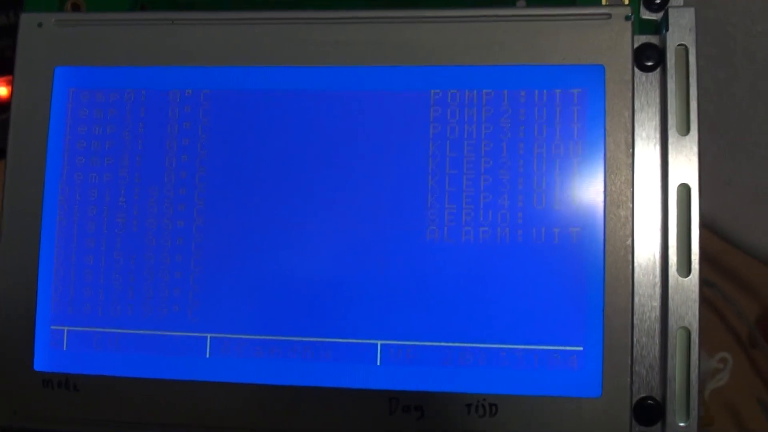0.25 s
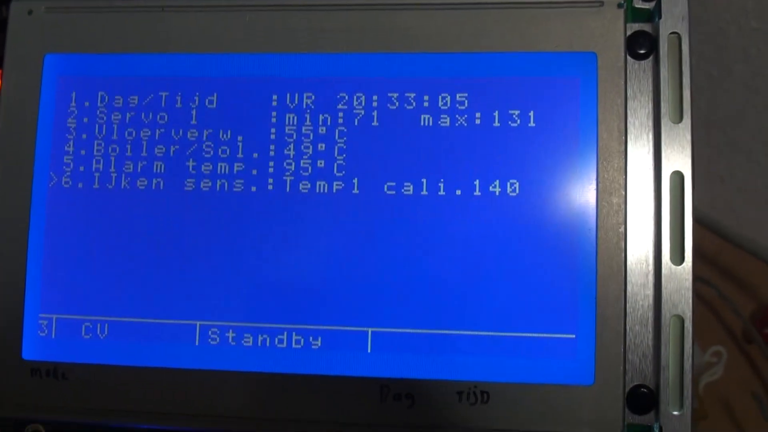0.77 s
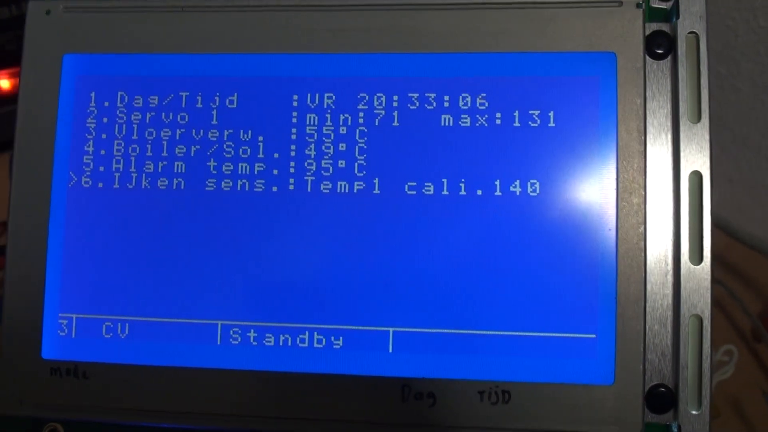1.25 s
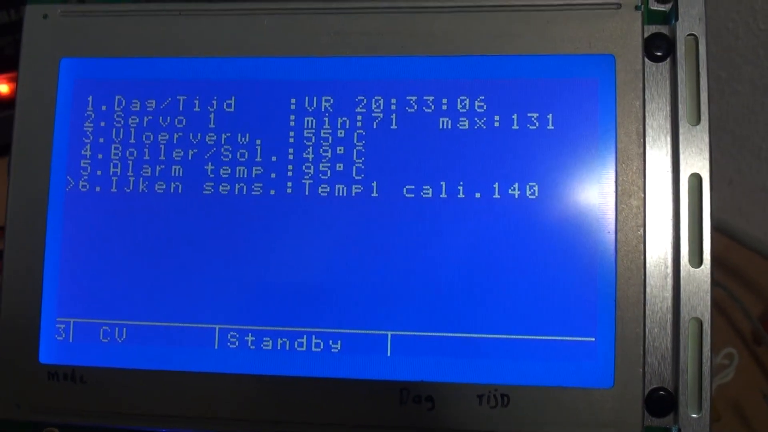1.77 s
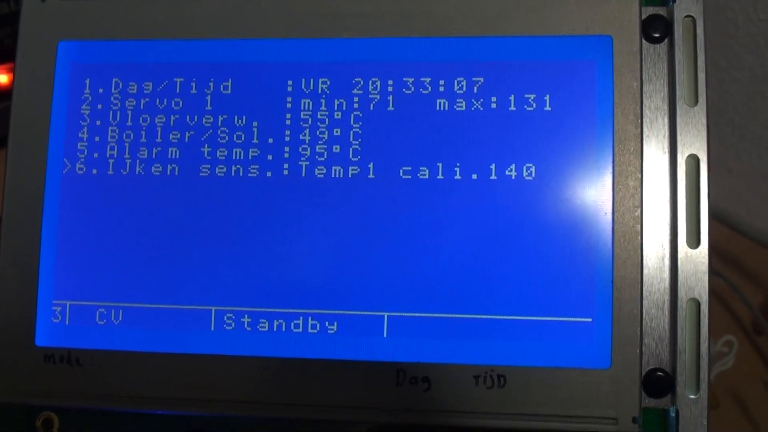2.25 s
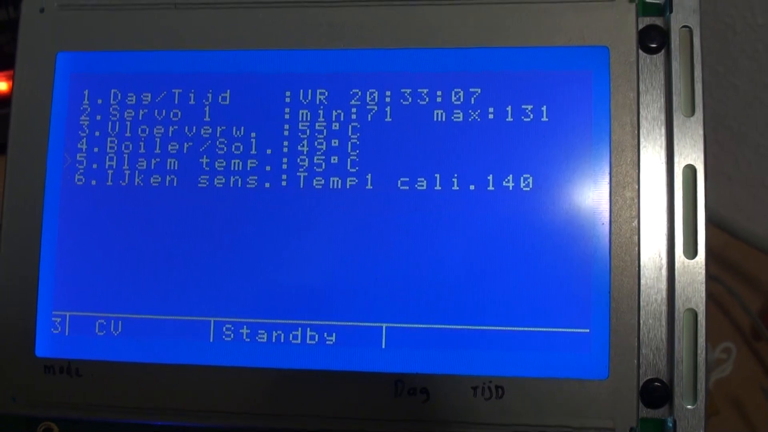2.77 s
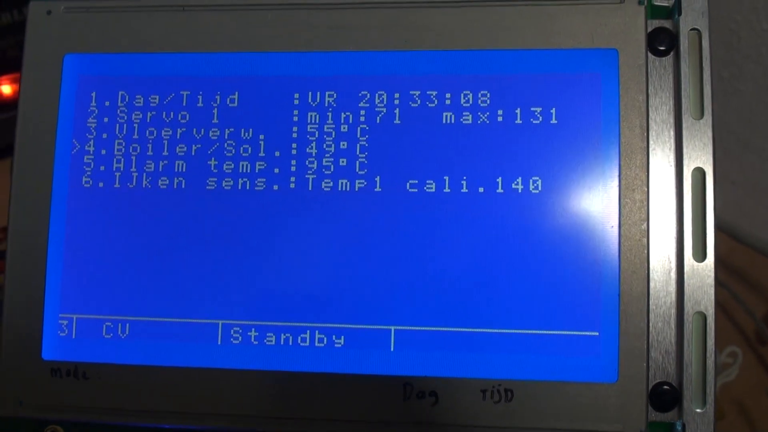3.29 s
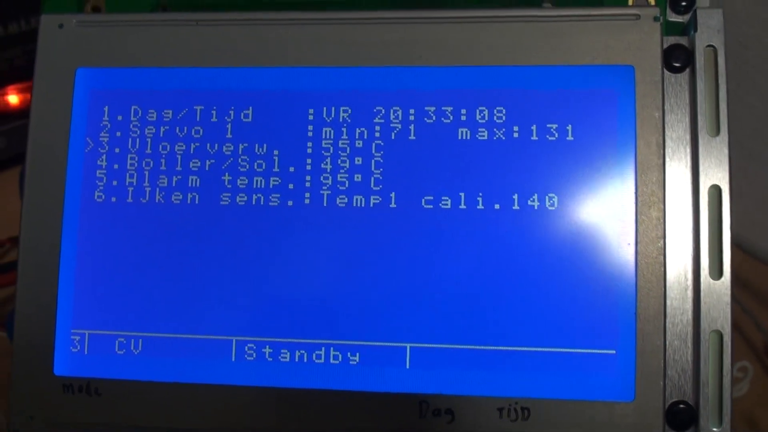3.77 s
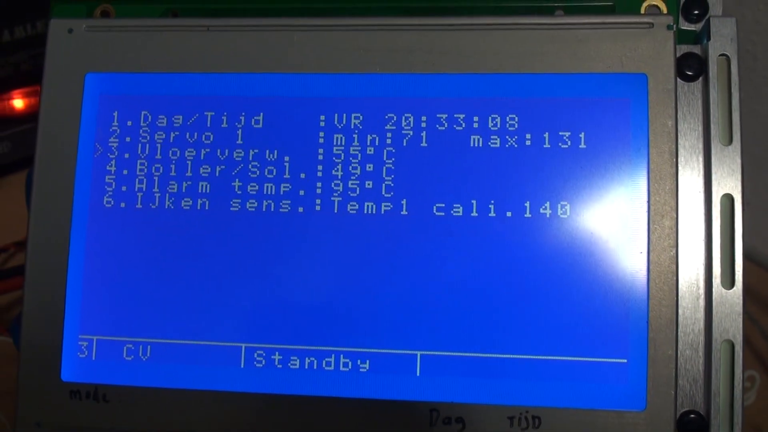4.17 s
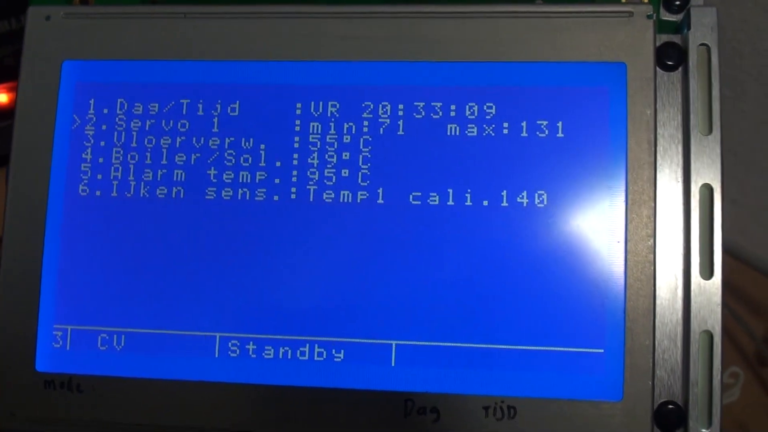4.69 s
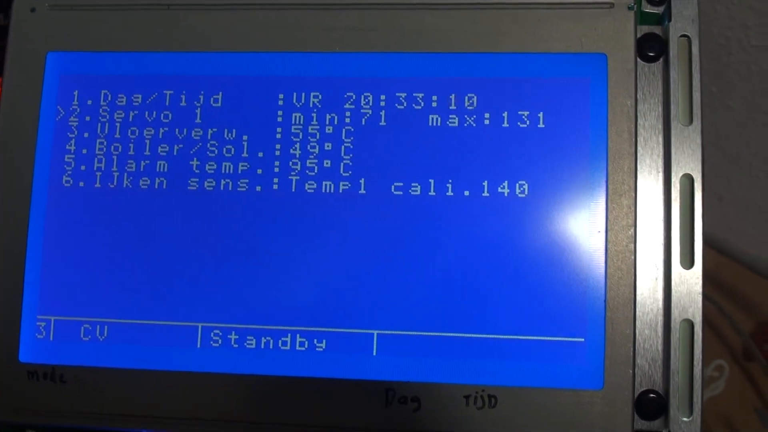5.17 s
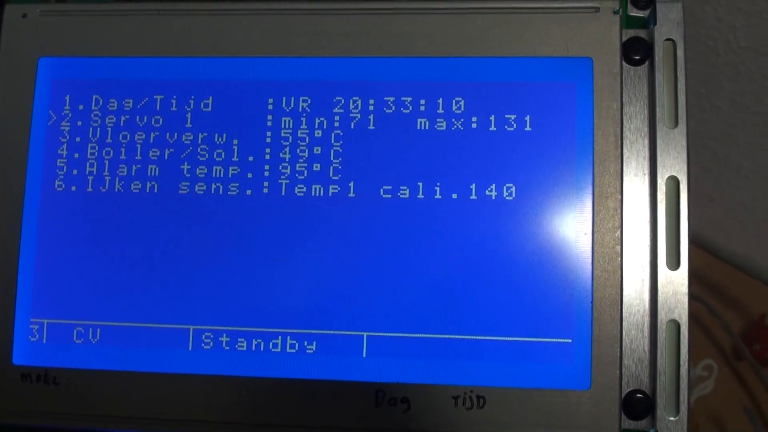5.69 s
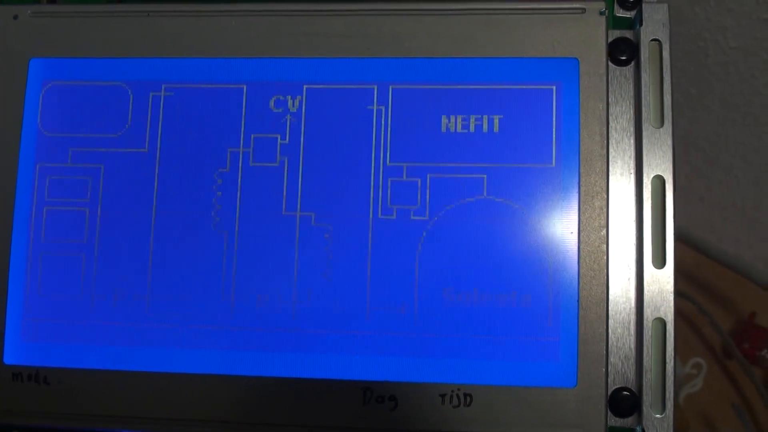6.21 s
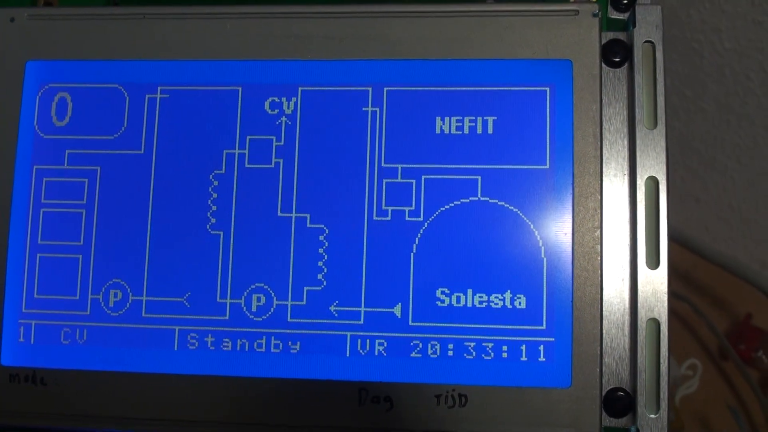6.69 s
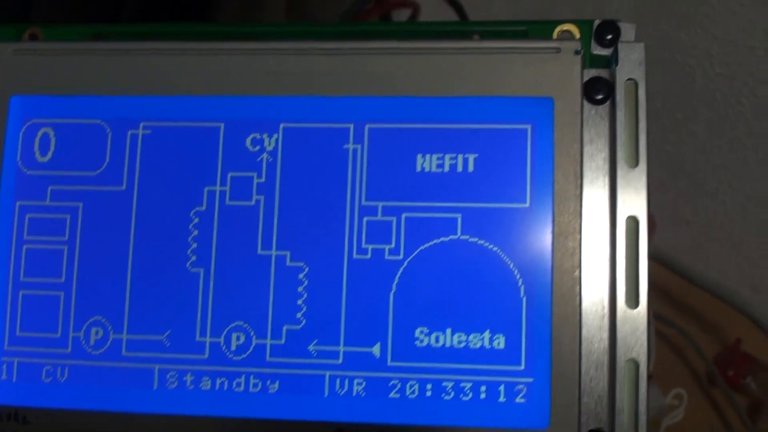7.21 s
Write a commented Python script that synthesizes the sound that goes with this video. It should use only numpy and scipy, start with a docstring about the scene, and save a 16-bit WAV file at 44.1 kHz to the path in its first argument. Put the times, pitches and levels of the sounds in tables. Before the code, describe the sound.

Close to a bare circuit board in a quiet room, a small button springs back with a sharp click. After a pause, three press-and-release pairs follow, the releases brighter and louder. A very faint metallic rub comes between them. Later a dull press and a hard release, then soft bumps and a light tap at the end, over faint hiss and hum.

```python
"""Quiet room, close to a bare circuit board: small tactile push buttons are pressed and let go.
Each click is a noise-burst crack, a board shiver, the dome's ringing sines and a low knock, with room tail.
Once something brushes over metal: friction noise drives narrow ringing modes.
Tiny ticks, soft handling bumps and a dull tap are shaped noise; below lie filtered hiss and a sine hum."""
import sys
import numpy as np
from scipy import signal
from scipy.fft import rfft, irfft, next_fast_len
from scipy.io import wavfile
from scipy.ndimage import uniform_filter1d, map_coordinates

SR = 44100
rng = np.random.default_rng(int(sys.argv[2]) if len(sys.argv) > 2 else 0)


def generate_wav(sig):
    """Save sig (samples, or channels by samples) to the path in sys.argv[1] as 16-bit PCM at SR."""
    pcm = np.round(np.clip(np.atleast_2d(sig).T, -1, 1) * 32767).astype(np.int16)
    wavfile.write(sys.argv[1], SR, pcm)


N = 328545
TIME = np.arange(N) / SR
HIT = TIME[:SR // 3]  # time axis of one short event, s

# spectrum of plunger scrapes and finger ticks: f/Hz, relative level/dB
TICK_SPECTRUM = [(3000, -31), (6000, 0), (8300, 1), (10500, -7), (12200, 3), (15000, -14)]


def buttons():
    """Pressing rattles against the stop; letting go cracks harder; each button has its own resonances."""
    # dome gives way under the finger: t/s, snap energy/dB, treble tilt/dB, button
    presses = [(2.3122, -7, 5, "step"), (3.1681, -6, 2.5, "step"), (3.9379, -5.5, 3.5, "step"),
               (5.4401, -14, 0.5, "exit")]
    # dome springs back: t/s, snap energy/dB, treble tilt/dB, button
    releases = [(0.1858, -5, 3, "menu"), (2.5818, -0.8, 0, "step"), (3.3671, 0, 0, "step"),
                (4.1855, -0.5, 0, "step"), (5.6392, -3, 1, "exit")]
    # switch and board resonances, step button pressed: f/Hz, width/Hz, relative level/dB
    press_body = [(780, 670, -16.5), (1440, 440, -13.5), (2230, 330, -18.5), (2590, 420, -13),
                  (2900, 240, -19), (3170, 290, -16), (3860, 400, -12), (4510, 330, -10),
                  (5400, 830, -10.5), (6400, 880, -8.5), (6830, 90, -19), (7420, 830, 1.5),
                  (8160, 510, -10), (8800, 790, -9), (9830, 510, -4.5), (10600, 310, -19), (11380, 670, -3),
                  (12100, 370, -3.5), (12900, 460, -9), (13700, 430, -13), (14180, 620, -15),
                  (14920, 370, -23.5), (15740, 450, -32.5)]
    # step button released: f/Hz, width/Hz, relative level/dB
    release_body = [(600, 380, -17.5), (950, 260, -15.5), (1860, 570, -15.5), (2130, 350, -17.5),
                    (2870, 520, -29), (3190, 200, -16), (3630, 210, -26), (3640, 150, -13.5),
                    (5310, 1350, -6.5), (5740, 630, -4), (6960, 1270, -0.5), (7240, 530, -6.5),
                    (8830, 680, -6), (9460, 600, -8), (10250, 750, -6), (11000, 420, -9), (11330, 590, -7),
                    (11880, 940, -12.5), (12860, 980, -13), (13600, 420, -11), (14100, 530, -11.5),
                    (14770, 550, -12)]
    # menu button released: f/Hz, width/Hz, relative level/dB
    menu_body = [(610, 530, -15.5), (1150, 460, -10), (1390, 290, -16), (1900, 350, -6), (2550, 390, -4.5),
                 (3300, 350, -7.5), (3930, 270, -14), (4350, 830, -9), (4980, 440, -0.5), (5480, 330, -9.0),
                 (5940, 620, -1), (6860, 1300, 1), (8090, 810, -3.5), (8700, 700, -3), (9750, 540, 1),
                 (10250, 310, -7.5), (11000, 650, -10), (12300, 950, -1.5), (14520, 740, -10),
                 (15110, 640, -12)]
    # exit button pressed: f/Hz, width/Hz, relative level/dB
    exit_body = [(650, 430, -9), (1080, 450, -7.5), (2280, 220, -11), (2560, 280, -6), (3450, 490, -13),
                 (4620, 720, -4), (5810, 470, 3), (7170, 780, -2), (7910, 420, -1), (8750, 430, -6),
                 (9410, 490, -8), (10620, 1120, -10.0), (12110, 1770, -8), (15050, 770, -24.5)]
    # exit button released: f/Hz, width/Hz, relative level/dB
    exit_release_body = [(700, 740, -15.5), (1075, 170, -5), (1500, 400, -13.5), (1900, 420, -16.5),
                         (2400, 580, -13), (3160, 640, -23), (4880, 720, -2), (5630, 700, 3),
                         (6370, 1100, 0.5), (7100, 880, -1), (8700, 1200, -1), (9600, 900, -6),
                         (11300, 1700, -5.5), (13000, 1600, -12), (15000, 970, -8)]
    # ring of the dome held down: f/Hz, relative level/dB, t60/s
    press_modes = [(6410, -12, 0.21), (6900, -12, .14), (7370, 8, 0.094), (7560, -13, 0.14), (8330, 2, .13),
                   (9900, -1, 0.09), (11250, -12, 0.084), (12700, -13, 0.092)]
    # ring of the dome set free: f/Hz, relative level/dB, t60/s
    release_modes = [(5540, -2, .17), (5560, -4, .17), (6040, -5, 0.21), (6500, 4, 0.077),
                     (6542, -17, 0.13), (6700, 1, 0.14), (7100, -10, .19), (7190, -5, .16), (7200, -3, .14),
                     (8800, -3, 0.27), (9400, 10, 0.091), (9700, -9, 0.14), (11300, -15, 0.13)]

    step_down = clicks(presses, "step", press_body, press_modes,
                       width_s=0.00017, crack_db=-3, board_t60_s=0.032, room_db=-9.5, ring_db=-11.5,
                       knock_db=-12, knock_t60_s=0.028, knock_room_db=-6.5, scrape_db=-25)
    step_up = clicks(releases, "step", release_body, release_modes,
                     width_s=0.0005, crack_db=0, board_t60_s=0.051, room_db=-7.2, ring_db=-16,
                     knock_db=-18.5, knock_t60_s=0.037, knock_room_db=-5, scrape_db=-33)
    menu_up = clicks(releases, "menu", menu_body, release_modes,
                     width_s=0.0003, crack_db=-3, board_t60_s=0.03, room_db=-7.5, ring_db=-21,
                     knock_db=-9.5, knock_t60_s=0.05, knock_room_db=-6.5, scrape_db=-40)
    exit_down = clicks(presses, "exit", exit_body, press_modes,
                       width_s=0.0003, crack_db=-18, board_t60_s=0.033, room_db=-7.5, ring_db=-21,
                       knock_db=-8.5, knock_t60_s=0.045, knock_room_db=-4.5, scrape_db=-28)
    exit_up = clicks(releases, "exit", exit_release_body, release_modes,
                     width_s=0.00034, crack_db=0, board_t60_s=0.055, room_db=-8.5, ring_db=-19,
                     knock_db=-15, knock_t60_s=0.033, knock_room_db=-4.5, scrape_db=-22)
    return step_down + step_up + menu_up + exit_down + exit_up


def clicks(rows, button, body, modes, width_s, crack_db, board_t60_s, room_db, ring_db,
           knock_db, knock_t60_s, knock_room_db, scrape_db, change_db=-5):
    """Each click: crack, board shiver, dome ring, lower knock and a faint plunger scrape."""
    out = np.zeros(N)
    # part of the shake common to all clicks of this button
    shiver = dying(board_t60_s, rise_s=0.00047)
    for t_s, snap_db, tilt_db, name in rows:
        if name != button:
            continue
        shake = packet(shiver + amp(change_db) * dying(board_t60_s, rise_s=0.00031))
        blow = amp(crack_db) * crack(width_s) + shake
        ring = dome_ring(modes, width_s)
        # the dome drives the high resonances, the finger's push the low ones
        treble = [(2800, -44), (4000, -tilt_db / 2), (7000, -tilt_db / 2), (12500, tilt_db / 2)]
        bass = [(3900, -4), (5000, -49)]
        dome = packet(struck(blow, body, treble, room_db) + amp(ring_db) * ring)
        knock = struck(dying(knock_t60_s, rise_s=0.00033), body, bass, knock_room_db)
        # start two widths early: the crack is fullest at t_s
        add(out, t_s - 2 * width_s, amp(snap_db) * (dome + amp(knock_db) * knock))
        # the plunger scrapes just before the dome flips
        scrape = packet(coloured(dying(0.024, rise_s=0.002), lambda hz: along(TICK_SPECTRUM, hz)))
        add(out, t_s - 0.003, amp(snap_db + scrape_db) * scrape)
    return out


def crack(width_s):
    """The dome flips: a very short burst with an even spectrum, fullest after two widths."""
    burst = rng.standard_normal(len(HIT))
    window = np.exp(-0.5 * (HIT / width_s - 2) ** 2)
    # alternate between flat spectrum and short window
    for _ in range(3):
        phase = np.angle(rfft(burst * window))
        burst = window * irfft(np.exp(1j * phase), len(HIT))
    return packet(burst)


def dome_ring(modes, rise_s):
    """Steel dome modes: decaying sines of random phase, levels varied by 2 dB; energy 1."""
    ring = np.zeros(len(HIT))
    for hz, db, t60_s in modes:
        decay = amp(db + rng.normal(0, 2) - 60 * HIT / t60_s)
        ring += decay * np.sin(2 * np.pi * (hz * HIT + rng.random()))
    return packet(ring * (1 - np.exp(-HIT / rise_s)))


def struck(blow, modes, slope, room_db):
    """A blow sounds through resonances and a spectral slope, and the room answers; energy 1."""
    def body_db(hz):
        power = sum(amp(db) ** 2 * np.abs(resonance(hz, centre, width) ** 2) ** 2
                    for centre, width, db in modes)
        return 10 * np.log10(power + 1e-12)

    def direct_db(hz):
        # divide by the blow's smoothed spectrum: every resonance is fed evenly
        blow_power = np.abs(rfft(blow, 2 * (len(hz) - 1))) ** 2
        smooth_power = np.abs(uniform_filter1d(blow_power, size=240))
        return body_db(hz) - 10 * np.log10(smooth_power + 1e-12) + along(slope, hz)

    def diffuse_db(hz):
        # the room gathers sound from all directions, which blurs the high resonances
        blurred = uniform_filter1d(body_db(hz), size=450)
        return np.where(hz > 1000, blurred, body_db(hz)) + along(slope, hz)

    direct = packet(coloured(blow, direct_db))
    diffuse = packet(coloured(room_tail(), diffuse_db))
    return packet(direct + amp(room_db) * diffuse)


def room_tail(rise_s=0.0012):
    """The room's answer: noise whose treble dies first; energy 1."""
    # room decay: f/Hz, t60/s
    room = [(400, 0.56), (1500, 0.23), (6000, .2), (10000, 0.16), (16000, 0.16)]
    hz, t, spectrum = signal.stft(rng.standard_normal(len(HIT)), SR, nperseg=256)
    decay = amp(-60 * t / along(room, hz)[:, None])
    tail = signal.istft(spectrum * decay, SR, nperseg=256)[1][:len(HIT)]
    return packet(tail * (1 - np.exp(-HIT / rise_s)))


def brush(level_db=-48, body_ring_db=-2.5, body_rub_db=-4.0, fizz_ring_db=-1.5, fizz_rub_db=-4.3,
          split_hz=3400, grain_db=1.4):
    """A short rubbing stroke: friction noise, and narrow metal modes that sing under its pressure."""
    # low modes of the rubbed metal: f/Hz, width/Hz, relative level/dB
    metal_low = [(833, 17, -0.5), (850, 18, 3.5), (960, 38, -5), (1030, 52, -1), (1074, 40, -4),
                 (1270, 35, -4), (1346, 26, -1), (1730, 20, -13), (2005, 48, -5), (2160, 25, -10),
                 (2400, 20, -10), (2490, 5, -3), (2610, 11, -10.5)]
    # high modes of the rubbed metal: f/Hz, width/Hz, relative level/dB
    metal_high = [(4120, 22, -17), (4930, 32, -8), (5160, 31, -18), (5480, 29, -0.5), (6100, 31, -8),
                  (6020, 91, 0), (6300, 29, -11), (6510, 23, -9), (6670, 31, -7), (7010, 72, -4),
                  (7300, 70, -9), (7410, 15, -17), (7920, 47, -3), (8100, 29, -6), (8500, 26, -17),
                  (9260, 36, -8), (9750, 37, -16), (10300, 47, -15), (10500, 35, -11), (10600, 34, -10),
                  (10800, 28, -14), (11200, 26, -16), (11600, 86, -4.5), (12400, 72, -14), (13100, 74, -9),
                  (13900, 50, -13)]
    # friction noise spectrum: f/Hz, relative level/dB
    friction = [(120, -22), (250, -7), (600, -9), (760, -8), (880, -3), (1150, -5.5), (1350, -3),
                (1520, -15), (1950, -7), (2500, -14), (3150, -26), (4600, -24), (5400, -16), (6230, -12),
                (10000, -19), (13400, -19), (16000, -34)]
    start_s, attack_s, hold_s, release_s = 3.49, 0.089, 0.082, 0.15
    sag_db, depth_db = 4, 25.5  # loss over the hold; first and last touch below the peak
    fizz_db, fizz_growth = 1, 1.28  # treble against body; its swing per dB of pressure

    t = TIME[:SR // 2]  # the metal rings on after the contact ends
    corners_s = np.cumsum([0, attack_s, hold_s, release_s])
    contact = np.clip((corners_s[-1] - t) / 0.02, 0, 1)
    pressure_db = np.interp(t, corners_s, [-depth_db, 0, -sag_db, -depth_db])
    push = contact * amp(pressure_db)
    scrape = contact * amp(fizz_db + fizz_growth * pressure_db)

    noise = filtered(rng.standard_normal(len(t)), lambda hz: amp(along(friction, hz)))
    rub = amp(grain_db * wobble(121, len(t))) * noise
    low_rub = filtered(rub, lambda hz: hz < split_hz)
    high_rub = rub - low_rub
    body = amp(body_ring_db) * singing(metal_low, push) + amp(body_rub_db) * push * unit(low_rub)
    fizz = amp(fizz_ring_db) * singing(metal_high, scrape) + amp(fizz_rub_db) * scrape * unit(high_rub)
    out = np.zeros(N)
    add(out, start_s, amp(level_db) * (body + fizz) * signal.windows.tukey(len(t), 0.1))
    return out


def singing(modes, drive):
    """Narrow modes driven with wandering strength and pitch; the narrower, the longer they ring."""
    out = np.zeros(len(drive))
    for hz, width_hz, db in modes:
        keep = np.exp(-np.pi * abs(width_hz) / SR)
        force = drive * amp(db + 4.1 * wobble(43.7, len(drive)))
        swing = signal.lfilter([1 - keep], [1, -keep], force)
        pitch_hz = hz + width_hz / 3 * wobble(82, len(drive))
        out += swing * np.sin(2 * np.pi * np.cumsum(pitch_hz) / SR)
    return np.linalg.norm(drive) * packet(out)


def handling():
    """Tiny ticks of the button caps and dull bumps of the hand."""
    return ticks() + bumps()


def ticks(gain_db=11, room_db=-2):
    """The finger resting on a button: short coloured noise touches with room tail."""
    # clearest ticks: t/s, level/dB before gain_db
    clear_ticks = [(1.343, -51), (1.6047, -46.5), (2.2523, -48), (2.3005, -45), (2.4947, -52), (2.685, -49)]
    out = np.zeros(N)
    for t_s, db in [*clear_ticks, *faint_ticks(count=5)]:
        touch = dying(0.021, rise_s=0.0005) + amp(room_db) * room_tail()
        tick = packet(coloured(touch, lambda hz: along(TICK_SPECTRUM, hz)))
        add(out, t_s, amp(db + gain_db) * tick)
    return out


def faint_ticks(count):
    """Fainter ticks at random times while the finger rests: t/s, level/dB before the tick gain."""
    return [(rng.uniform(1.0, 4.5), rng.normal(-57, 1.5)) for _ in range(count)]


def bumps():
    """Soft bumps and rustles of the hand: band noise that swells and dies."""
    # bumps: t/s, level/dB, f/Hz, Gaussian width/octaves, rise/s, t60/s
    hand_bumps = [(2.69, -53, 700, 0.14, 0.0089, 0.12), (2.964, -56.5, 1570, .6, .02, 0.29),
                  (4.875, -58.5, 1800, 1.25, .004, 0.14), (5.52, -51.5, 345, 0.24, 0.01, 0.15),
                  (6.24, -47.5, 382, 0.055, 0.015, 0.13)]
    out = np.zeros(N)
    for t_s, db, centre_hz, octaves, rise_s, t60_s in hand_bumps:
        band = filtered(rng.standard_normal(len(HIT)),
                        lambda hz: np.exp(-0.5 * (np.log2((hz + 1) / centre_hz) / octaves) ** 2))
        swell = amp(-60 * HIT / t60_s) * (1 - np.exp(-HIT / rise_s))
        add(out, t_s, amp(db) * np.linalg.norm(swell) * packet(band * swell))
    return out


def tap(t60_s=0.018, room_db=-12):
    """One light contact with the housing: burst and decaying noise, dulled by a low-mid spectrum."""
    # taps: t/s, energy/dB
    taps = [(7.314, -25.5)]
    # tap spectrum: f/Hz, relative level/dB
    tap_spectrum = [(400, -22), (700, -20), (1100, -2), (1350, 9.5), (1700, -7), (2200, -4), (2700, -10),
                    (3500, -28), (6000, -42)]
    out = np.zeros(N)
    for t_s, db in taps:
        blow = crack(0.0002) + dying(t60_s, rise_s=0.00045) + amp(room_db) * room_tail()
        add(out, t_s, amp(db) * packet(coloured(blow, lambda hz: along(tap_spectrum, hz))))
    return out


def background(hiss_db=-62.5, bands_db=-69, hum_db=-1, drift_cycles=0.48):
    """Steady room noise with a few resonant bands, and a hum wavering in level and phase."""
    # room noise spectrum: f/Hz, relative level/dB
    quiet = [(20, -42), (30, -15), (45, -3), (80, -7), (111, -1.5), (163, -2.5), (191, -8), (240, -5.5),
             (377, -11), (456, -14), (560, -12), (764, -11.5), (1060, -14), (5110, -23.5), (16400, -29.5)]
    # resonant noise bands: f/Hz, width/Hz, level/dB before bands_db
    air_modes = [(80.6, 17, -3.5), (157.7, 11.7, -4), (310, 61, -6.5), (534.8, 55, -4.5), (658.6, 65, -7),
                 (6453, 35, -13.5)]
    # hum partials: f/Hz, level/dB before hum_db
    hum_partials = [(118.4, -71), (236.9, -75), (672.9, -81.5), (748.3, -74), (2498, -89.5)]
    hiss = unit(filtered(rng.standard_normal(N), lambda hz: amp(along(quiet, hz))))
    bands = np.zeros(N)
    for centre_hz, width_hz, db in air_modes:
        band = filtered(rng.standard_normal(N), lambda hz: resonance(hz, centre_hz, width_hz) ** 2)
        bands += amp(db) * unit(band)
    hum = np.zeros(N)
    for hz, db in hum_partials:
        tone = np.sin(2 * np.pi * (hz * TIME + drift_cycles * wobble(4)))
        hum += amp(db + 1.7 * wobble(3.13)) * unit(tone)
    return amp(hiss_db) * hiss + amp(bands_db) * bands + amp(hum_db) * hum


def amp(db):
    """Decibels to gain."""
    return 10 ** (np.asarray(db) / 20)


def unit(x):
    """Scaled to rms 1."""
    return x / np.sqrt(np.mean(x ** 2) + 1e-20)


def packet(x):
    """Scaled to energy 1."""
    return x / (np.linalg.norm(x) + 1e-20)


def along(points, hz):
    """(f/Hz, value) points interpolated on a log frequency axis."""
    f, v = np.transpose(points)
    return np.interp(np.log(hz + 1), np.log(f + 1), v)


def filtered(x, response):
    """x times a response of frequency, zero-padded."""
    m = next_fast_len(len(x) + 8192)
    return irfft(rfft(x, m) * response(np.fft.rfftfreq(m, 1 / SR)), m)[:len(x)]


def coloured(x, level_db):
    """Minimum-phase filter with the given dB over frequency: attacks stay sharp."""
    def response(hz):
        # fold the cepstrum onto positive time; gain floor -80 dB
        cepstrum = irfft(np.log(np.maximum(amp(level_db(hz)), 1e-4)))
        half = len(cepstrum) // 2
        cepstrum[1:half] *= 2
        cepstrum[half + 1:] = 0
        return np.exp(rfft(cepstrum))
    return filtered(x, response)


def resonance(hz, centre_hz, width_hz):
    """Response of one damped mode."""
    damping = 1j * hz * width_hz
    return damping / (centre_hz * centre_hz - hz * hz + damping)


def wobble(rate_hz, size=N):
    """Smooth random curve through rate_hz knots a second."""
    knots = rng.standard_normal(int(size * rate_hz / SR) + 4)
    return map_coordinates(knots, [TIME[:size] * rate_hz])


def dying(t60_s, rise_s):
    """Noise that rises and dies away; energy 1."""
    envelope = amp(-60 * HIT / t60_s) * (1 - np.exp(-HIT / rise_s))
    return packet(rng.standard_normal(len(HIT)) * envelope)


def add(track, t_s, sound):
    """Mix a sound into the track at t_s."""
    start = round(t_s * SR)
    track[start:start + len(sound)] += sound[:N - start]


def scene():
    """All sources summed at one microphone."""
    return (buttons() + brush() + handling() + tap() + background())[None]


def record(dry, top_hz=16500):
    """The camera's band limit: nothing passes above top_hz."""
    return np.array([filtered(channel, lambda hz: hz < top_hz) for channel in dry])


dry = scene()
out = record(dry)
generate_wav(out)
```